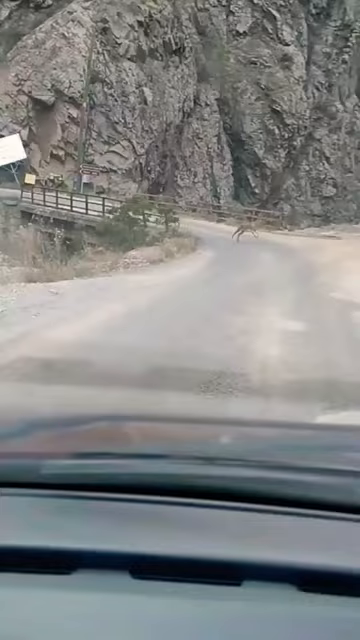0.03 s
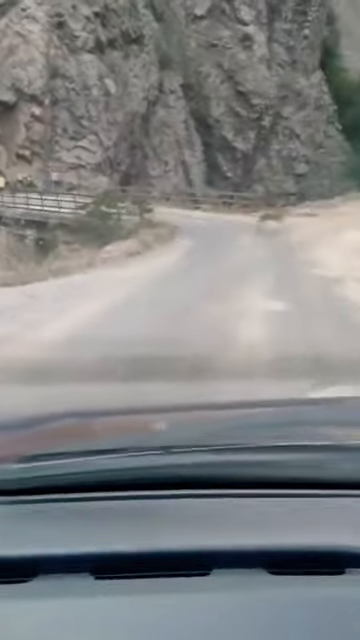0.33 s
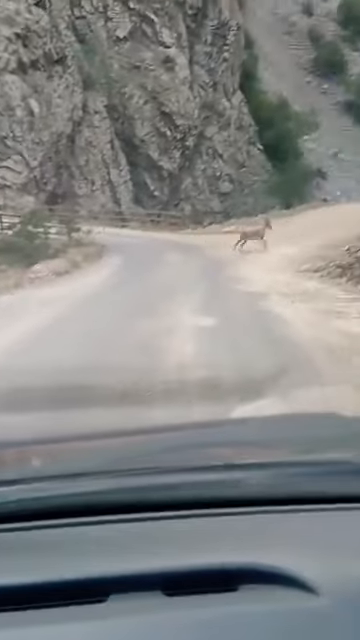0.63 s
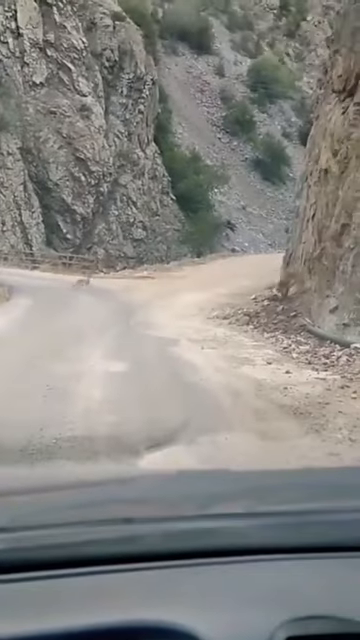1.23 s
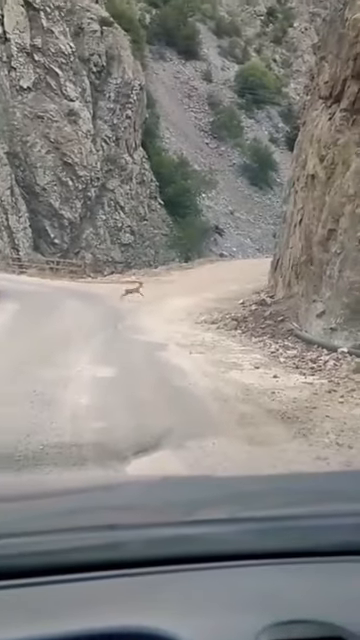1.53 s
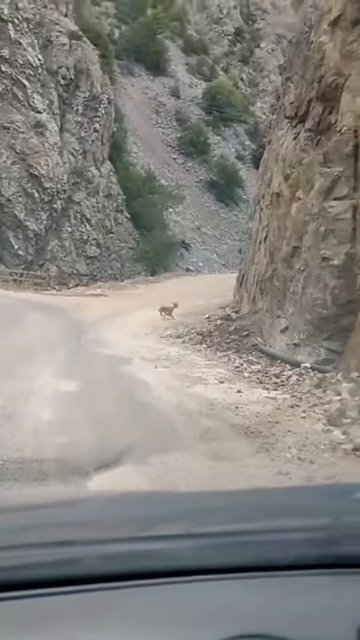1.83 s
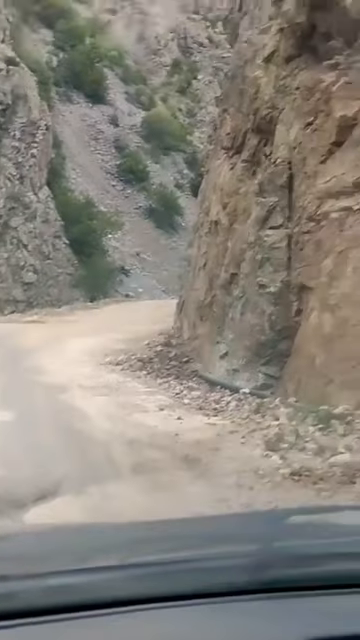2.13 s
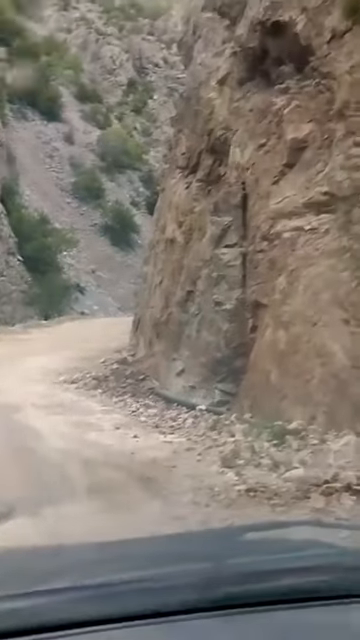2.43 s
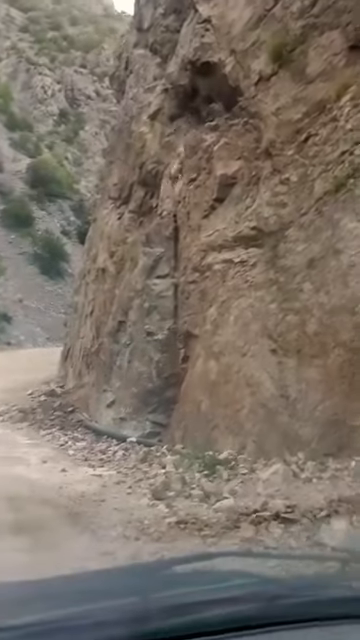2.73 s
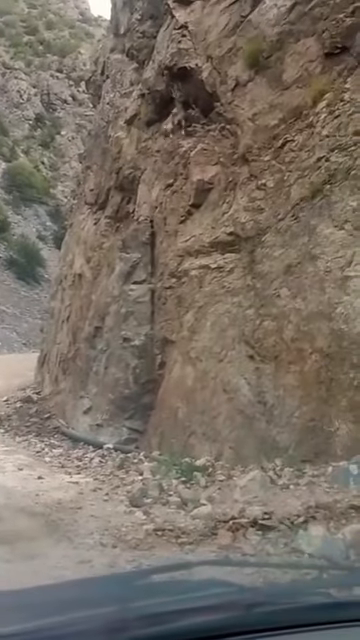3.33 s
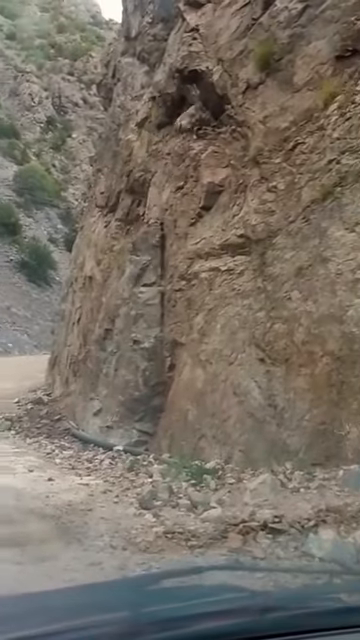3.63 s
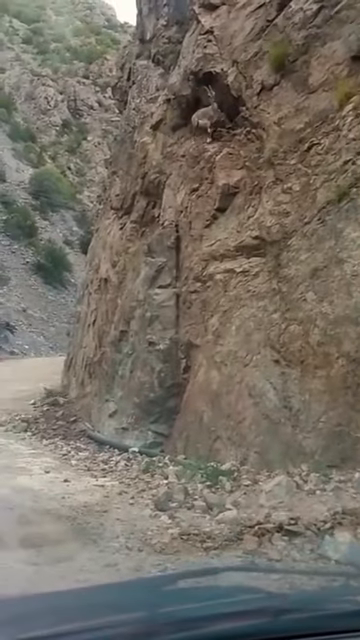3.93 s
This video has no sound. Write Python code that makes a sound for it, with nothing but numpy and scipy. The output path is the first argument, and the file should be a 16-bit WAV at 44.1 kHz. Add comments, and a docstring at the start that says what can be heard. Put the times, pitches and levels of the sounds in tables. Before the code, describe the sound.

Wind thumps and flutters unevenly on a phone microphone in a car driving along a mountain road. Under it sit a steady low rumble and light draught hiss, while loose parts tick now and then and the body knocks briefly.

```python
"""Gusty wind booms on the left and flutters on the right, over the rumble of a car on a mountain road.
Air from an open window buffets a phone, and each microphone port has its own eddies: they thump on
the left, and crackle around a resonance near 500 Hz and snap on the right. The draught hisses at both
ports and faintly rings narrow gaps on the left. The car's trim rings, its body knocks, loose parts tick."""
import sys
import numpy as np
from scipy import signal
from scipy.fft import rfft, irfft
from scipy.io import wavfile

SR = 44100
rng = np.random.default_rng(int(sys.argv[2]) if len(sys.argv) > 2 else 0)


def generate_wav(sig):
    """Save sig (samples, or channels by samples) to the path in sys.argv[1] as 16-bit PCM at SR."""
    pcm = np.round(np.clip(np.atleast_2d(sig).T, -1, 1) * 32767).astype(np.int16)
    wavfile.write(sys.argv[1], SR, pcm)


N = 176400
T = np.arange(N) / SR
FREQ_HZ = np.arange(N // 2 + 1) * SR / N


def undb(db):
    """Decibels to gain."""
    return 10 ** (np.asarray(db) / 20)


def unit(x):
    """Scale to rms 1."""
    return x / np.sqrt(np.mean(x ** 2))


def curve(rows):
    """Join (seconds, value) rows by straight lines."""
    return np.interp(T, *np.array(rows).T)


def below(x, hz):
    """Zero-phase low-pass."""
    return irfft(rfft(x) / (1 + (FREQ_HZ / hz) ** 4), N)


def shape(x, colour):
    """Minimum-phase filter of unit power gain along (Hz, dB) rows; 12 dB/octave down past the ends."""
    f = np.maximum(FREQ_HZ, 1)
    hz, db = np.array(colour).T
    skirts = np.minimum(f / hz[0], 1) ** 2 * np.minimum(hz[-1] / f, 1) ** 2
    magnitude = undb(np.interp(np.log(f), np.log(hz), db)) * skirts
    cepstrum = irfft(np.log(magnitude), N)
    response = np.exp(rfft(2 * cepstrum * (np.arange(N) < N // 2)))
    return irfft(rfft(x) * response / np.sqrt(np.mean(np.abs(response) ** 2)), N)


def noise(colour):
    """Coloured noise of rms 1."""
    return unit(shape(rng.standard_normal(N), colour))


def walk(rate_hz):
    """Smooth random drift of rms 1, changing at about rate_hz."""
    f = FREQ_HZ / rate_hz
    return unit(irfft(rfft(rng.standard_normal(N)) * np.sqrt(f) * np.exp(-f * f), N))


def buffet(flow, bass, colour, rate_hz, swing_db, bright_db, split_hz, spikes_per_s, spike_db):
    """Port turbulence: pressure noise with spikes; each eddy lifts it, most above split_hz."""
    eddy = 2 * np.tanh(walk(rate_hz) / 2)
    spikes = (rng.random(N) < spikes_per_s / SR) * rng.uniform(0.24, 1, N) * rng.choice([-1, 1], N)
    pressure = shape(rng.standard_normal(N) + undb(spike_db) * unit(spikes), colour)
    low = below(pressure, split_hz)
    low_gain = unit(undb(swing_db * eddy))
    high_gain = unit(undb((swing_db + bright_db) * eddy))
    gusty = unit(low * low_gain + (pressure - low) * high_gain)
    bass_shelf = (undb(curve(bass)) - 1) * below(gusty, hz=258)
    return (gusty + bass_shelf) * undb(curve(flow))


def left_boom():
    """Slower eddies buffet the left port with a deep boom."""
    # Buffeting and its bass shelf. Each row: time in seconds, gain in dB.
    flow = [(.25, -20), (.35, -16.5), (.42, -12), (.66, -15.5), (.75, -15.5), (.795, -21), (.85, -19),
            (.95, -16), (1.05, -16), (1.12, -17), (1.25, -13.5), (1.31, -20.5), (1.39, -12.5), (1.62, -22),
            (1.68, -21.5), (1.74, -15), (1.79, -21), (1.92, -15), (2.15, -14.5), (2.48, -18), (2.66, -10.5),
            (2.705, -21), (2.78, -13), (3.04, -18.5), (3.1, -7.5), (3.16, -25), (3.19, -12.5),
            (3.24, -21.5), (3.42, -15.5), (3.48, -23.5), (3.52, -12), (3.6, -23.5), (3.695, -8),
            (3.712, -21.5), (3.99, -21.5)]
    bass = [(.25, -3.5), (.65, 5.5), (.85, -0.5), (1.05, 3), (1.6, -1.5), (2.2, 4.5), (2.6, -1.5),
            (3.1, -2.5), (3.5, -7), (3.99, 4.5)]
    # Eddy spectrum. Each row: frequency in Hz, relative density in dB.
    colour = [(25, -33), (45, -36), (65, -14), (120, -1), (220, -3), (350, -7.5), (500, -15.5),
              (750, -28.5), (1200, -30), (2000, -36), (5000, -101)]
    return buffet(flow, bass, colour, rate_hz=29, swing_db=3.5, bright_db=3,
                  split_hz=430, spikes_per_s=90, spike_db=-5)


def right_flutter():
    """Faster eddies flutter at the right port, resonant near 500 Hz."""
    # Buffeting and its bass shelf. Each row: time in seconds, gain in dB.
    flow = [(.25, -24.5), (.5, -16.5), (.63, -18.5), (.68, -23.5), (.87, -15.5), (.92, -26.5), (.99, -25.5),
            (1.03, -17), (1.08, -25.5), (1.21, -14), (1.29, -20.5), (1.33, -15.5), (1.69, -24),
            (1.73, -18.5), (2.29, -16.5), (2.41, -20.5), (2.55, -13), (2.68, -14), (2.83, -14),
            (3.08, -15.5), (3.32, -14), (3.44, -19.5), (3.5, -13.5), (3.7, -21.5), (3.78, -14),
            (3.825, -22.5), (3.9, -16.5), (3.96, -22)]
    bass = [(.25, 0.5), (1.0, 2.5), (1.7, 4), (2.25, 2.5), (2.6, -0.36), (3.3, -6), (3.99, -1)]
    # Eddy spectrum. Each row: frequency in Hz, relative density in dB.
    colour = [(25, -36.5), (55, -11), (100, -6.5), (160, -3.5), (405, -8), (480, 1.5), (720, -5),
              (1000, -12), (1500, -23.5), (2400, -37), (4500, -60.5), (7000, -59)]
    return buffet(flow, bass, colour, rate_hz=54.5, swing_db=2, bright_db=2,
                  split_hz=650, spikes_per_s=170, spike_db=-1.5)


def gap_tones():
    """Narrow gaps resonate in the draught, each flickering on its own."""
    # Gap resonances. Each row: centre in Hz, width per filter stage in Hz, relative level in dB.
    gaps = [(1338, 26, -5), (1612, 10, -13.5), (2420, 30, -16), (2554, 75, -6.5), (3830, 110, -9.5)]
    f = np.maximum(FREQ_HZ, 1)
    tones = np.zeros(N)
    for hz, width_hz, db in gaps:
        gain = undb(db + 1.2 * walk(rate_hz=15))
        stage = 1 / (1 + 1j * (f * f - hz * hz) / (2 * f * width_hz))
        tones += gain * unit(irfft(rfft(rng.standard_normal(N)) * stage ** 2, N))
    return tones


def left_hiss():
    """Draught over the left port; the gaps ring out more as it grows."""
    # Draught. Each row: time in seconds, relative level in dB.
    levels = [(0.25, -47.5), (0.35, -41.5), (0.85, -45.5), (1.23, -38.5), (1.25, -47.5), (1.49, -43),
              (1.6, -52), (1.92, -41), (2.05, -39), (2.19, -43.5), (2.41, -41.5), (2.45, -47),
              (2.66, -41.5), (2.68, -48.2), (3.02, -44.5), (3.3, -53), (3.4, -46.5), (3.42, -51.5),
              (3.68, -44), (3.72, -52), (3.99, -47.5)]
    # Hiss spectrum. Each row: frequency in Hz, relative density in dB.
    colour = [(300, 0), (1100, -0.5), (1750, -17.5), (2200, -4.5), (3200, -13.5), (4650, -13),
              (4950, -23.5), (6500, -21), (8500, -17.5), (9400, -13), (11300, -24), (14000, -26.5)]
    draught_db = curve(levels)
    growth_db_per_db = 0.27
    ringing = gap_tones() * undb(-5 + growth_db_per_db * (draught_db - draught_db.mean()))
    return (noise(colour) + ringing) * undb(draught_db + 0.88 * walk(rate_hz=56))


def right_hiss():
    """Thin, flickering hiss of the draught over the right port."""
    # Draught. Each row: time in seconds, relative level in dB.
    levels = [(.27, -50), (.42, -56.5), (.62, -49.5), (.67, -53), (.86, -50), (.94, -56), (1.2, -51),
              (1.49, -49.5), (1.57, -56), (1.9, -49.5), (2.25, -50.5), (2.35, -53), (2.53, -48.5),
              (2.96, -51.5), (3.4, -54), (3.66, -50), (3.76, -57), (3.9, -49.5), (3.98, -56)]
    # Hiss spectrum. Each row: frequency in Hz, relative density in dB.
    colour = [(1500, 3.5), (3200, -5.5), (4600, -11.5), (5100, -19.5), (7000, -16), (9300, -17),
              (11500, -27), (14000, -33)]
    return noise(colour) * undb(curve(levels) + 1.8 * walk(rate_hz=70))


def road_rumble():
    """Diffuse rumble of the car on the road, independent in each channel."""
    # Rumble. Each row: time in seconds, left level in dB.
    levels = [(.25, -39), (.6, -27), (1.0, -34), (1.3, -24), (1.65, -35), (2.15, -21.5), (2.6, -27),
              (3.2, -29), (3.99, -26)]
    # Rumble spectrum. Each row: frequency in Hz, relative density in dB.
    colour = [(55, -22.5), (100, -9), (165, -6), (260, -7), (500, -15.5)]
    return np.array([noise(colour), undb(-4) * noise(colour)]) * undb(curve(levels))


def bursts(rows, colour, puff_db=0):
    """One pressure spike per row, inside a puff of noise that swells and dies."""
    pressure, air = np.zeros(N), rng.standard_normal(N)
    for at_s, db, tau_s in rows:
        pressure += undb(db + puff_db) * air * np.exp(-np.abs(T - at_s) / tau_s)
        pressure[int(at_s * SR)] += undb(db) * np.sqrt(tau_s * SR)
    return shape(pressure, colour)


def crackles():
    """Single eddies crackle in the right port's resonance."""
    # Eddies. Each row: time in seconds, relative level in dB, time constant in seconds.
    eddies = [(.26, -20, 0.0043), (.338, -15, 0.0035), (.366, -16.5, 0.0031), (.386, -10, 0.0019),
              (.451, -16.5, 0.0031), (.629, -15, .005), (.644, -13, .004), (.686, -21, .003),
              (.86, -15.5, .005), (.889, -11, 0.0028), (1.036, -14, 0.0029), (1.209, -16, 0.004),
              (1.328, -15.5, .004), (1.453, -16, 0.0033), (1.53, -10.5, 0.0045), (1.914, -13, .004),
              (1.949, -13, 0.0045), (2.065, -20, .003), (2.1, -14.5, 0.0044), (2.176, -19, .0035),
              (2.279, -15.5, .0035), (2.695, -15.5, .003), (2.717, -12.5, .005), (2.737, -18, .003),
              (2.812, -17.5, .006), (2.976, -16, 0.0033), (3.015, -14.5, 0.0037), (3.099, -11.5, 0.0045),
              (3.131, -14.5, 0.0027), (3.175, -14, .0024), (3.202, -16, 0.002), (3.214, -25, .004),
              (3.252, -14.5, 0.0042), (3.317, -17.5, 0.0064), (3.403, -14.5, 0.004), (3.496, -15.5, .003),
              (3.557, -19, 0.0028), (3.664, -8, 0.0028), (3.732, -8.5, 0.0022), (3.771, -16, 0.0061),
              (3.872, -15.5, 0.0049), (3.886, -12, .0033), (3.907, -12.5, 0.0026), (3.925, -12, .0025)]
    # Crackle spectrum. Each row: frequency in Hz, relative density in dB.
    colour = [(80, -16), (380, -14.5), (500, 4), (1100, 0), (1900, -13.5), (2800, -20.5), (4500, -32.5),
              (6000, -57), (13000, -69)]
    return bursts(eddies, colour)


def snaps(tau_s=.0035):
    """Sharp, bright pressure spikes."""
    # Snaps. Each row: time in seconds, relative level in dB.
    events = [(.339, -38), (.453, -36), (.643, -27), (.890, -26), (1.208, -33), (1.531, -28), (1.950, -33),
              (2.178, -35), (2.896, -28.5), (3.202, -35), (3.214, -35)]
    # Snap spectrum. Each row: frequency in Hz, relative density in dB.
    colour = [(500, -3), (1500, 2), (3200, 0), (4600, -4), (6500, -13), (9000, -22), (14000, -33)]
    return bursts([(at_s, db, tau_s) for at_s, db in events], colour)


def thumps():
    """Big eddies thump the left port."""
    # Eddies. Each row: time in seconds, relative level in dB, time constant in seconds.
    eddies = [(.447, -13, 0.0066), (.632, -11, 0.0042), (.821, -11.5, 0.0041), (.835, -9.5, 0.003),
              (1.414, -17, .006), (1.503, -14, 0.0069), (1.569, -11.5, .005), (1.581, -12.5, 0.0034),
              (1.747, -12, 0.007), (2.275, -14, 0.0094), (2.435, -13.5, .006), (2.863, -12, 0.0032),
              (2.982, -14.5, 0.005), (3.105, -17, 0.0088), (3.124, -10, .006), (3.208, -9.5, .0036),
              (3.41, -10, .0064), (3.654, -12, 0.0057), (3.694, -8.5, .004), (3.954, -9.5, .006)]
    # Thump spectrum. Each row: frequency in Hz, relative density in dB.
    colour = [(30, -17), (90, -5), (260, 1.5), (600, -3), (1200, -16), (2200, -33), (5000, -49),
              (12000, -52)]
    return bursts(eddies, colour, puff_db=-0.5)


def ring(at_s, modes):
    """Modes struck together, each dying away."""
    age_s = np.maximum(T - at_s, 0)
    return sum(undb(db) * np.sin(2 * np.pi * hz * age_s) * np.exp(-np.log(1000) * age_s / t60_s)
               for hz, db, t60_s in modes)


def trim_ring():
    """The car hits a bump and its trim rings."""
    # Trim modes. Each row: frequency in Hz, level in dB, T60 in seconds.
    modes = [(770, -6.5, .09), (1206, -17, .1)]
    return ring(at_s=.618, modes=modes)


def body_knocks():
    """Road jolts make the car's body boom briefly."""
    # Jolts. Each row: start in seconds, level in dB.
    jolts = [(.642, -7), (3.65, -7), (3.682, -2.5)]
    # Body resonance. Each row: frequency in Hz, relative level in dB, T60 in seconds.
    modes = [(235, 0, .08)]
    return sum(undb(db) * ring(at_s, modes) for at_s, db in jolts)


def rattles(tau_s=.002):
    """Something loose ticks drily, each tick with its own brightness."""
    # Ticks. Each row: time in seconds, relative level in dB, upper edge in Hz.
    ticks = [(.803, -24, 3600), (1.379, -15.5, 3400), (1.423, -14, 2600), (1.432, -19, 2400),
             (1.653, -11.5, 2600), (2.177, -18, 3300), (2.896, -20, 5000), (3.202, -19, 3600),
             (3.798, -15, 2900)]
    # Tick spectrum. Each row: frequency as a ratio to the upper edge, relative density in dB.
    spectrum = [(.15, -5), (.3, 0), (.55, -3.5), (.9, -11), (1.5, -52)]
    rattle = np.zeros(N)
    for at_s, db, edge_hz in ticks:
        colour = [(ratio * edge_hz, density_db) for ratio, density_db in spectrum]
        rattle += bursts([(at_s, db, tau_s)], colour, puff_db=-5)
    return rattle


def scene():
    """Independent wind at the two ports, over the sounds of the car."""
    road = road_rumble()
    left = undb(-0.42) * left_boom() + thumps() + undb(11) * left_hiss()
    right = undb(0.52) * right_flutter() + undb(-2) * crackles() + snaps() + undb(11) * right_hiss()
    return np.array([left + body_knocks(), right + trim_ring() + rattles()]) + road


def record(dry):
    """Abrupt start and stop with very short fades; highest peaks rounded, top treble cut."""
    start_s, fade_s = .232, .00097
    ceiling, clip_band_hz, top_hz = .88, 3000, 14400
    gated = dry * np.clip(np.minimum(T - start_s, T[-1] - T) / fade_s, 0, 1)
    low = below(gated, clip_band_hz)
    clipped = low / (1 + (low / ceiling) ** 6) ** (1 / 6)
    rounded = gated + below(clipped - low, clip_band_hz)
    return signal.sosfilt(signal.ellip(10, .2, 80, top_hz, fs=SR, output="sos"), rounded)


dry = scene()
out = record(dry)
generate_wav(out)
```